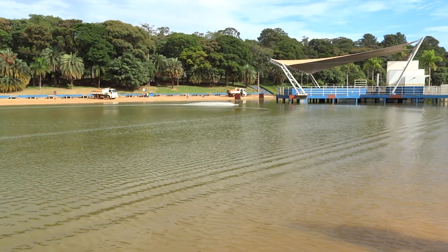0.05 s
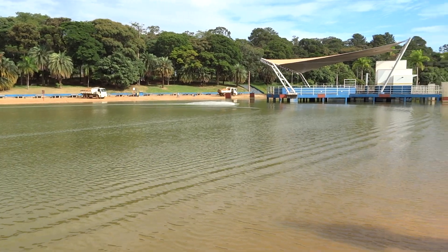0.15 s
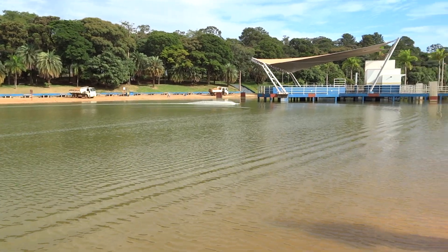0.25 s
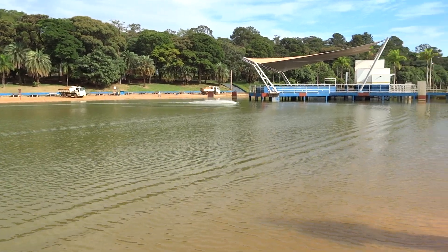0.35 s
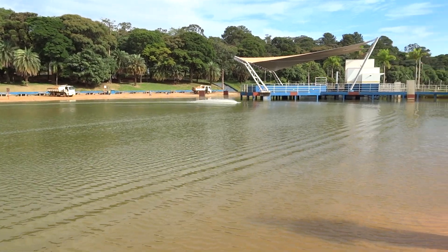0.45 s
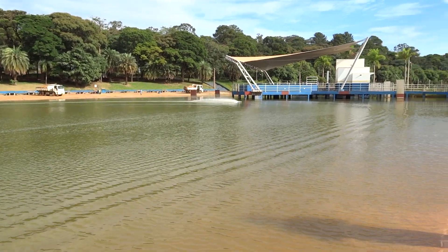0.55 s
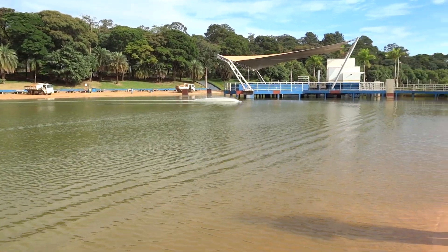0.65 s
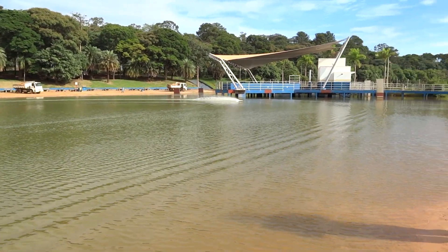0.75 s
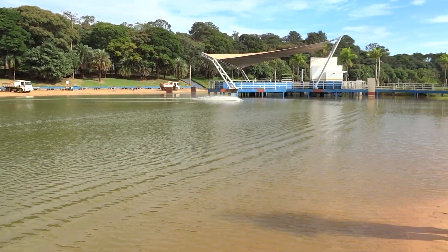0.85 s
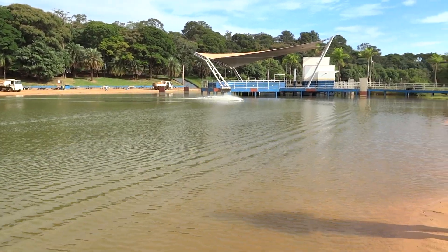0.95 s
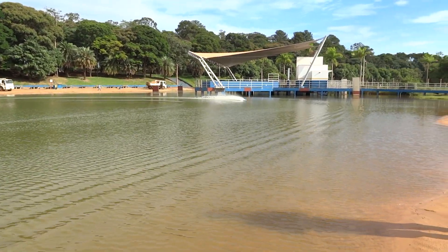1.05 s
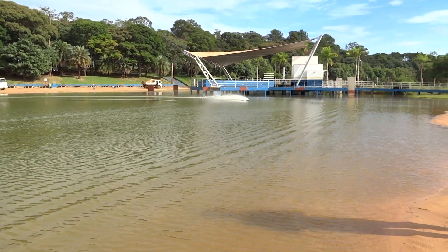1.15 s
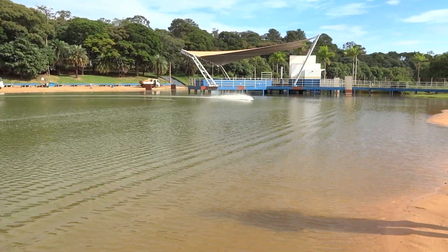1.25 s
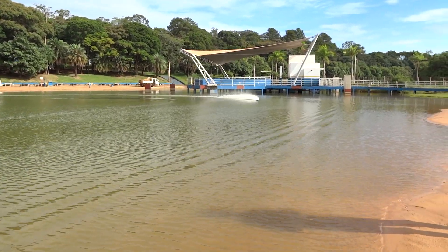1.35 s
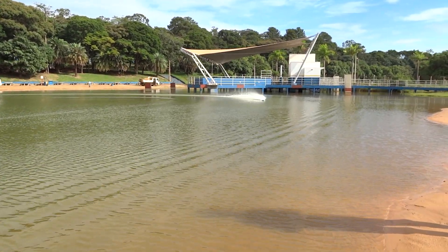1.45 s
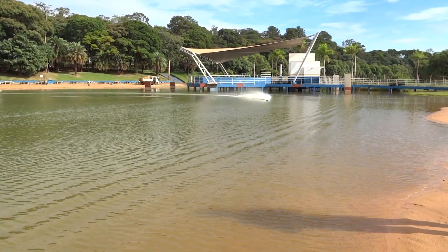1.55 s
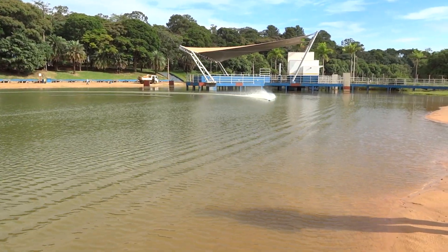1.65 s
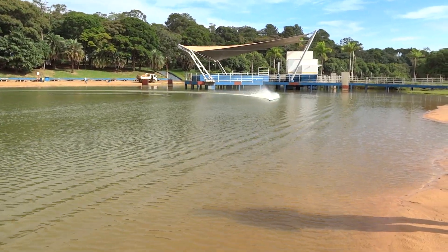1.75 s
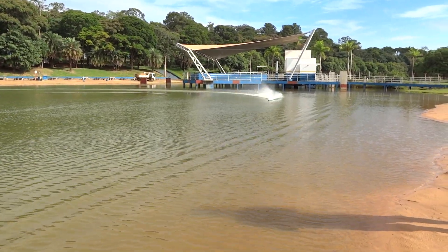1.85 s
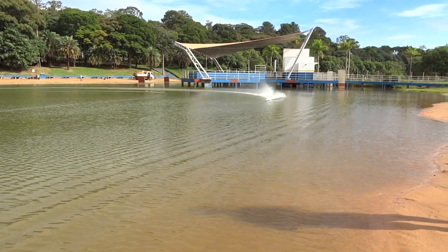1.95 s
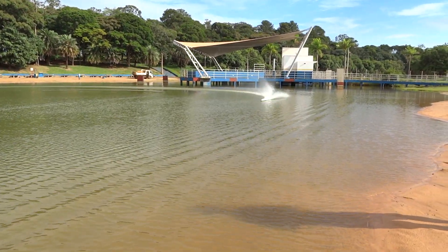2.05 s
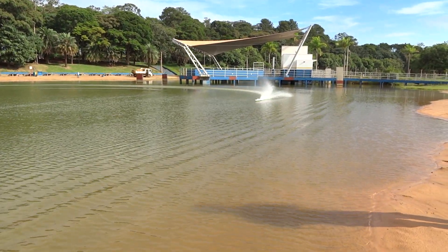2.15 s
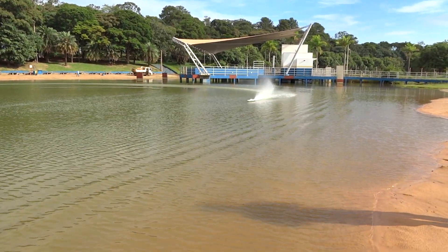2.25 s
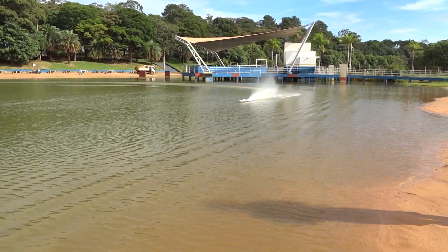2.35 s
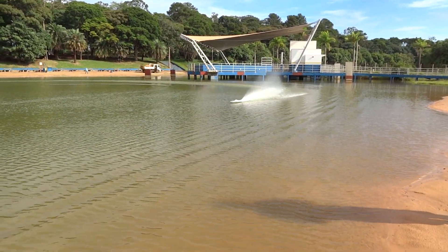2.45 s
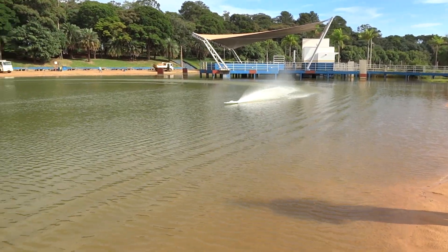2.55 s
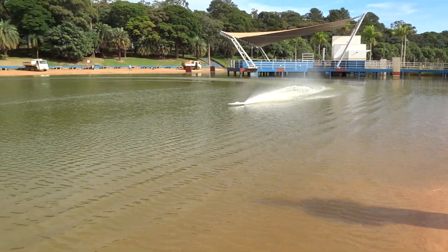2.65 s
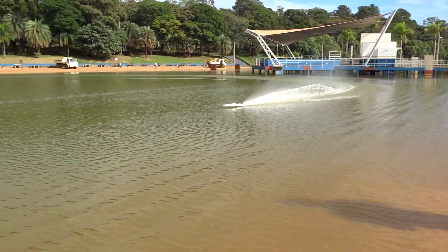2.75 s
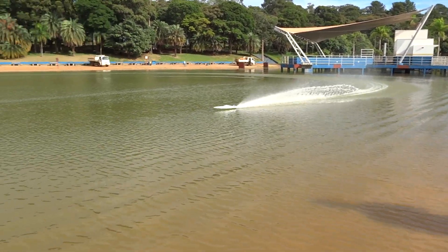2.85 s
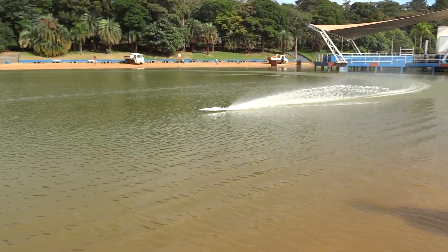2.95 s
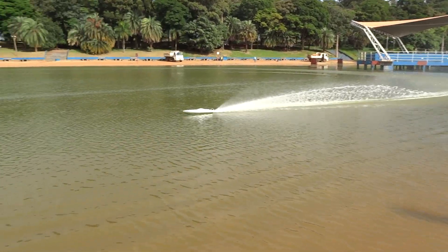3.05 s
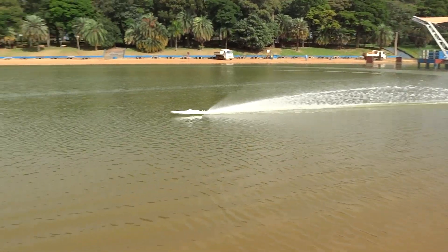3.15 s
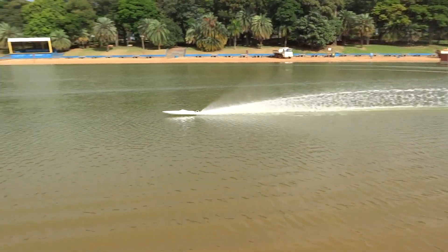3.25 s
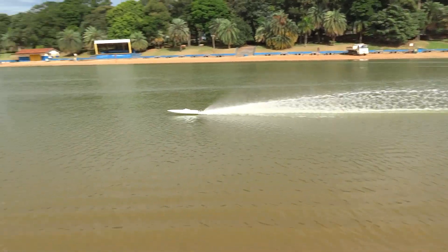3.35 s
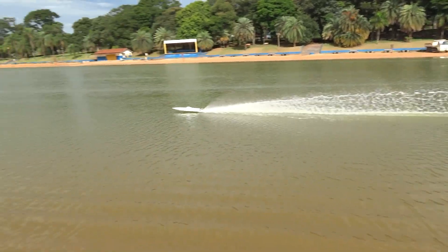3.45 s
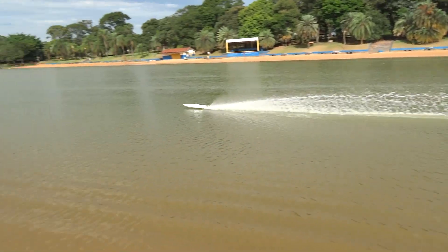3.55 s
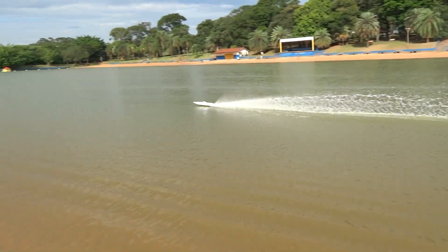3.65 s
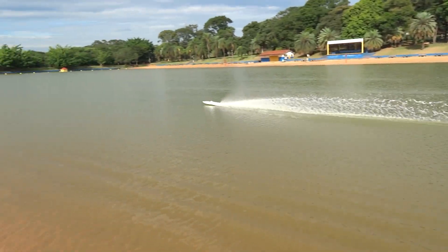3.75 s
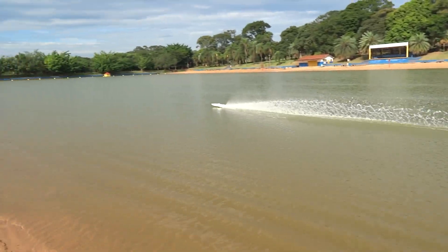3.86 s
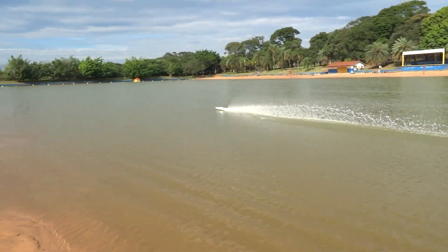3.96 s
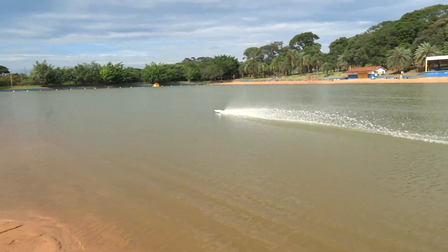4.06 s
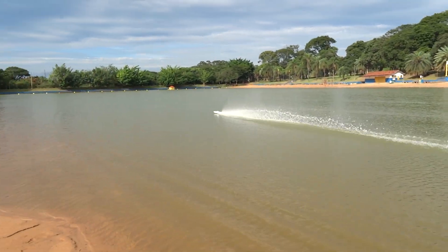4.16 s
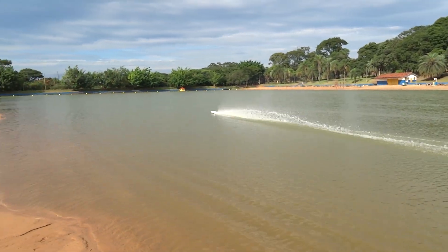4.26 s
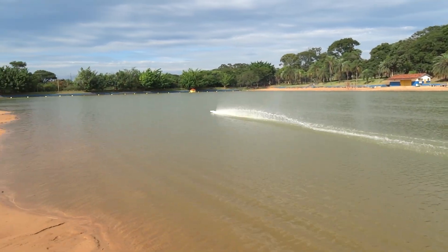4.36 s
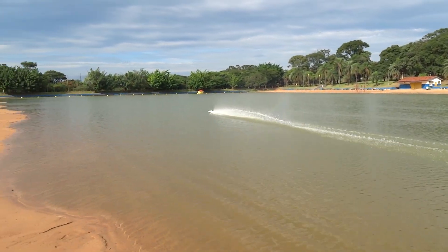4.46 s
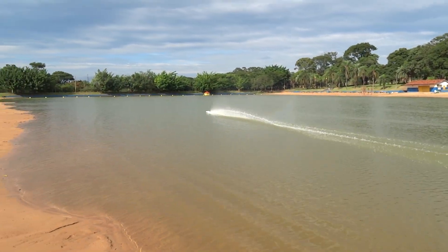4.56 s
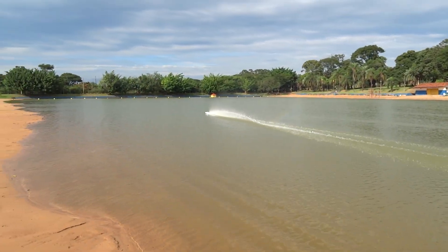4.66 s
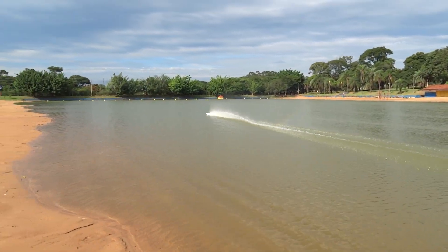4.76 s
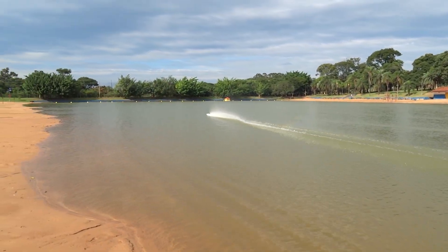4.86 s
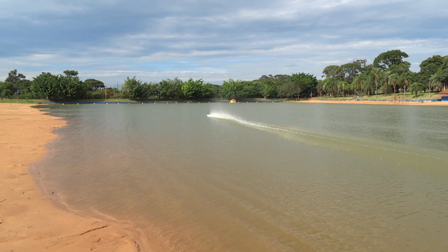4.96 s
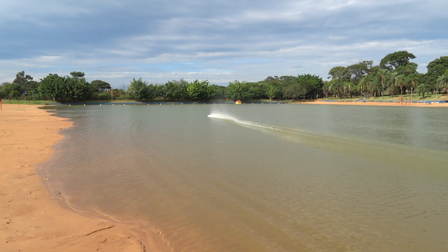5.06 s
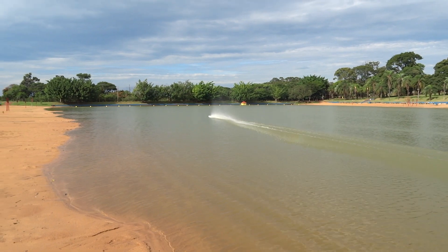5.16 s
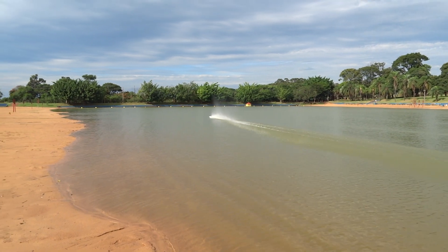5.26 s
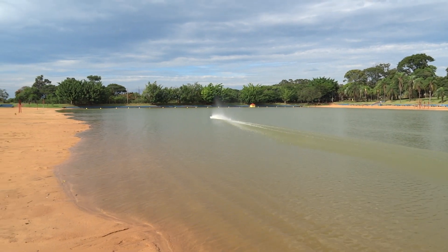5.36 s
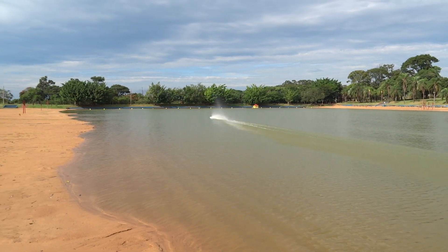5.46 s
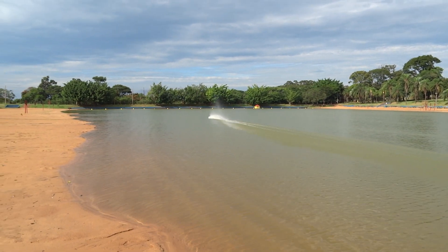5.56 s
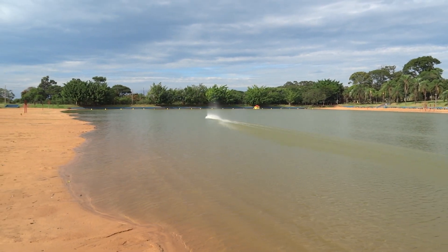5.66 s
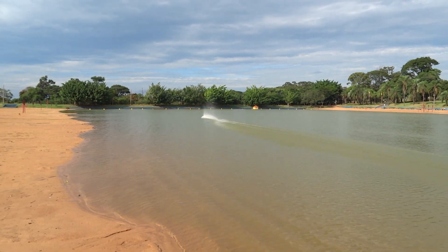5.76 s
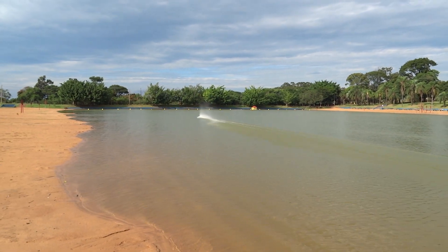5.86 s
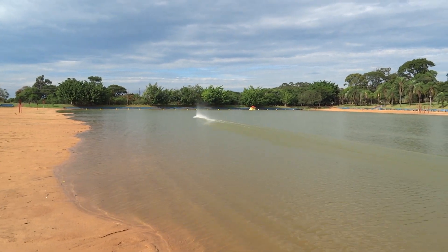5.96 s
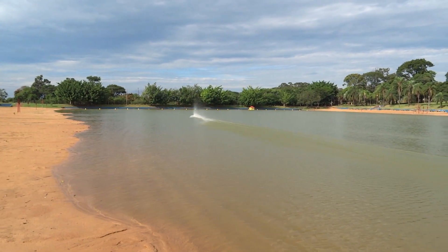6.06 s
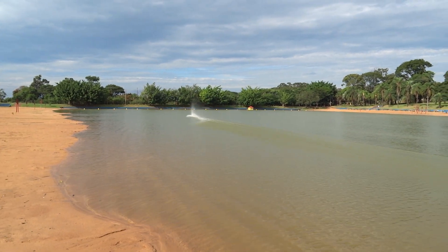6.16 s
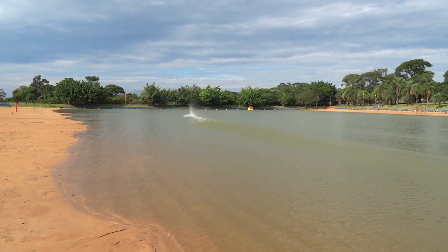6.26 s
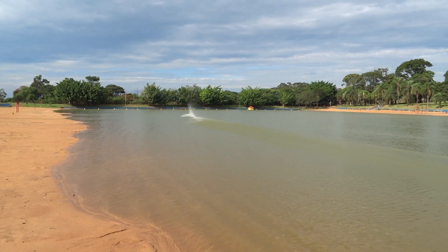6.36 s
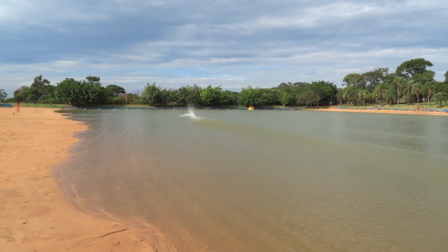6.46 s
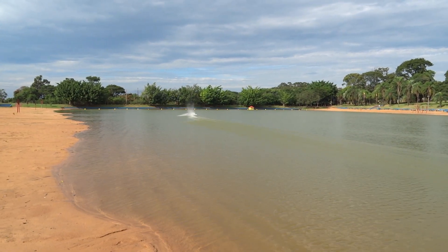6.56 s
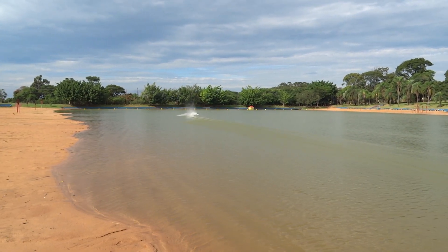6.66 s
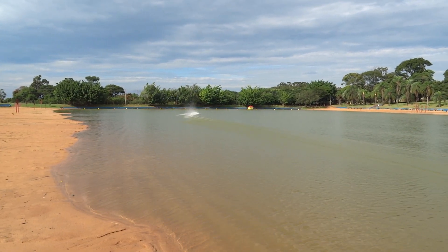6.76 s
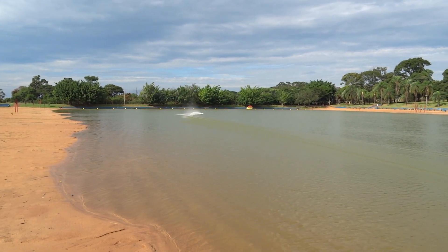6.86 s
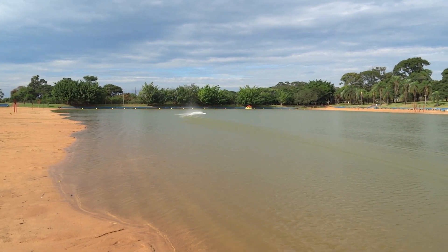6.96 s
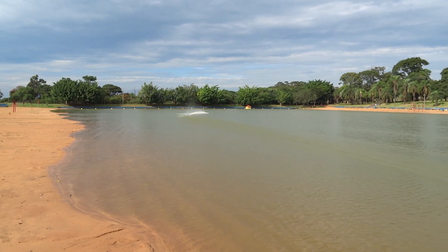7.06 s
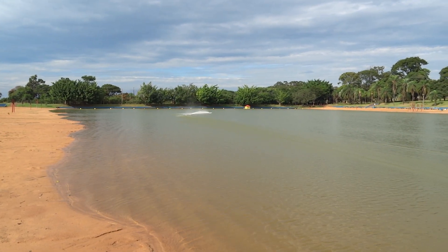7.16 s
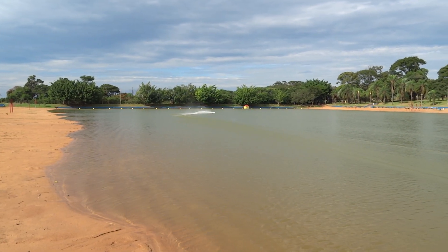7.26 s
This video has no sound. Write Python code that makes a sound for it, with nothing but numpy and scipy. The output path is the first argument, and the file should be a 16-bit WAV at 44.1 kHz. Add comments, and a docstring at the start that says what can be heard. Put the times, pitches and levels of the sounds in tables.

```python
"""Out on a lake, a radio-controlled speedboat races in, passes the shore and runs off into a far turn.
Its whine is a stack of sine tones on the orders of the shaft, led by the two-bladed propeller.
Filtered noise makes the churn, splash and hissing rooster tail; random grains and short cracks make it spatter.
Behind it lie a low wash, a faint drone and a breeze in the trees. Low noise makes a handling thump
and then, as the boat fades, gusts of wind; gliding whistles make far birds at the end."""
import sys
import numpy as np
from scipy import signal
from scipy.fft import rfft, irfft, next_fast_len
from scipy.io import wavfile

SR = 44100
rng = np.random.default_rng(int(sys.argv[2]) if len(sys.argv) > 2 else 0)


def put_to_file(sound):
    """Save the sound as 16-bit audio at rate SR, in the file named by the first command-line argument."""
    columns = np.atleast_2d(sound).T  # one column per channel
    safe = np.clip(columns, -1, 1)
    whole_steps = np.round(safe * 32767)
    wavfile.write(sys.argv[1], SR, whole_steps.astype(np.int16))


N = 322371
TIME = np.arange(N) / SR  # seconds


# Motor speed before Doppler. Each row: time in seconds, shaft speed in turns per second.
SHAFT_SPEED = [(0.0, 388.4), (0.4, 387.9), (0.88, 389.7), (2.0, 389.1), (2.08, 392.3), (2.64, 395.3),
               (2.88, 392.5), (3.04, 393.2), (3.36, 392.7), (3.76, 393.8), (4.4, 394.2), (4.96, 393.4),
               (5.12, 394.5), (5.76, 394.5), (6.0, 396.3), (6.32, 403.1), (6.72, 399.0), (7.3, 398.2)]


def shaft_angle(wobble_turns_per_s=0.5065, shake_turns_per_s=0.7):
    """Motor speed with its Doppler shift, wavering a little as the propeller bites the ripples; in radians."""
    speed, = in_time(SHAFT_SPEED)
    receding_m_per_s = BOAT_M_PER_S * ahead_m(0) / np.hypot(CLOSEST_M, ahead_m(0))
    heard = speed * (1 - receding_m_per_s / SOUND_M_PER_S)
    waver = wobble_turns_per_s * drift(9.26) + shake_turns_per_s * drift(69.2)
    return 2 * np.pi * np.cumsum(heard + waver) / SR


# The blade tone, at twice the shaft speed. Each row: time in seconds, level in dB.
BLADE_TONE = [(0.0, -38.8), (0.4, -34.0), (1.44, -40.6), (2.64, -26.8), (2.83, -16.0), (3.02, -14.6),
              (3.14, -17.5), (3.23, -23), (3.33, -19.3), (3.46, -19.8), (3.6, -30), (3.75, -26.5),
              (4.0, -29.0), (4.16, -35.8), (4.32, -30.7), (5.5, -41.3), (6.16, -45.3), (6.21, -57),
              (6.31, -49), (6.42, -59), (6.7, -53), (7.04, -58), (7.2, -51), (7.3, -50.0)]
# The octave above the blade tone. Each row: time in seconds, level in dB.
BLADE_OCTAVE = [(0.0, -42.5), (0.8, -32.5), (2.08, -45.5), (2.32, -31), (2.55, -28.5), (3.12, -30),
                (3.36, -47), (3.44, -31), (3.6, -47), (3.76, -28), (4.08, -32), (4.32, -34.5), (4.4, -30),
                (4.88, -43.5), (5.2, -39), (5.68, -67), (6.15, -50.5), (6.45, -48), (6.66, -48.5),
                (6.78, -61), (7.3, -64)]


def propeller(angle, remote, flutter_db=1.23):
    """Two blades slap the surface on every turn; far off, their tone comes by many paths and breaks up."""
    paths = many_paths(scattered=0.65 * remote ** 3, rate_hz=16)
    tone_db, = in_time(BLADE_TONE)
    octave_db, = in_time(BLADE_OCTAVE)
    tone = np.abs(paths) * partial(2 * angle + np.angle(paths), tone_db, flutter_db)
    octave = partial(4 * angle, octave_db, flutter_db)
    return tone + octave


# The other orders of the shaft, as if at the closest point.
# Each row: order number, level in dB coming, level in dB going.
SHAFT_ORDERS = [(1, -58, -52.5), (3, -38.5, -42), (5, -36, -34.5), (6, -37.5, -32), (7, -51, -39.5),
                (8, -40.5, -35), (9, -38, -51), (10, -38.5, -43), (11, -38.5, -36), (12, -37, -44),
                (13, -43, -50), (14, -40, -52), (15, -38, -41), (16, -33.5, -41), (17, -51, -36),
                (18, -37, -39), (19, -48, -42), (20, -40, -42), (22, -48, -41)]
# The hull radiates each order in beams that sweep over the shore.
# Each row: order number, centre in seconds, peak in dB as if at the closest point, bell spread in seconds.
HULL_BEAMS = [(1, 0.33, -42.5, 0.89), (1, 1.78, -37, 0.54), (1, 2.84, -47.5, 0.17), (1, 3.71, -46, 0.18),
              (1, 4.5, -45, 0.75), (3, 3.21, -29, 0.09), (5, 0.26, -27.5, 0.27), (5, 2.32, -28.5, 0.28),
              (5, 2.95, -26, 0.08), (5, 3.32, -29.5, 0.063), (5, 3.78, -23.5, 0.14), (5, 4.7, -28, .08),
              (5, 5.95, -35, 0.11), (5, 6.45, -30, 0.13), (6, 1.67, -31.5, .2), (6, 2.32, -25.5, 0.24),
              (6, 3.35, -32, 0.1), (6, 3.85, -28.5, 0.093), (6, 4.58, -27.5, 0.13), (6, 5.2, -25, .17),
              (6, 5.77, -26.5, 0.32), (6, 6.42, -29, 0.15), (7, 3.7, -32, 0.18), (7, 4.35, -29, 0.28),
              (7, 5.2, -28, 0.14), (7, 5.67, -26.5, 0.33), (8, 3.21, -29.5, .16), (8, 4.07, -28.5, 0.15),
              (9, 2.42, -30, 0.14), (9, 3.9, -35, 0.2), (9, 5.9, -29, 0.12), (10, 0.32, -31, .08),
              (10, 1.03, -33, .15), (10, 3.43, -34, 0.13), (10, 4.25, -28.5, 0.17), (10, 5.42, -30, 0.17),
              (10, 5.9, -25, 0.16), (10, 6.4, -31.5, 0.2), (11, 3.07, -31.5, 0.22), (11, 3.67, -34, .15),
              (11, 5.88, -28, .12), (12, 2.74, -27, .16), (12, 3.36, -31, .12), (12, 4.3, -33, .18),
              (13, 4.2, -35, .3), (14, .72, -33, .1), (14, 2.5, -38, .25), (14, 4.35, -37, .25),
              (16, 2.42, -23, 0.074), (16, 2.82, -33, .14), (17, 4.2, -34, .25), (20, .7, -34, 0.7)]
# The hull digs in and throws a surge of water.
# Each row: centre in seconds, bell spread in seconds, extra spray in dB, extra splash in dB.
SURGES = [(0.313, 0.079, 7.5, 5.5), (0.734, 0.12, 6.5, 4), (1.006, 0.097, 3.5, 2), (1.217, 0.027, 3, 1.5),
          (1.42, 0.088, 5, 5), (1.67, 0.1, 7, 4), (2.426, 0.073, 0.5, 1.5), (3.088, 0.22, 2.5, 2.5),
          (4.266, 0.25, 2, 3.5), (4.786, 0.34, 2, 1), (5.7, .08, 2, 1), (5.91, 0.048, -2.5, 4.5)]
# The throttle eases in the far turn: start and length in seconds, drop of these orders in dB.
EASE_S, EASE_TAKES_S, EASE_DB = 6.61, 0.12, 11
# Share of power frayed into noise, per order: near, and added far off; corner of the fraying in Hz.
FRAY_NEAR, FRAY_FAR, FRAY_HZ = 0.006, 0.012, 100
AIR_LOSS_DB = 0.1  # per order squared, at full remoteness


def motor(angle, remote, fading_db=0.9, bite_db=0.17):
    """Shaft orders fade with distance and flare in beams; high ones buzz in surges, fray and lose most to air."""
    reach_db = passing_db(0, 0) - EASE_DB * np.clip((TIME - EASE_S) / EASE_TAKES_S, 0, 1)
    # only surges with strong spray load the motor; it starts lightly loaded
    load = sum(swell(s, 0, spread_s) for s, spread_s, spray_db, _ in SURGES if spray_db > 2.8)
    load = load - np.clip(1 - TIME / BUILD_S, 0, 1) / 2
    stern = going()
    out = np.zeros(N)
    for order, coming_db, going_db in SHAFT_ORDERS:
        facing_db = coming_db + stern * (going_db - coming_db)
        all_round = from_db(facing_db + fading_db * drift(3.6) + bite_db * order * load)
        beam_power = sum(swell(s, db, spread_s) ** 2 for k, s, db, spread_s in HULL_BEAMS if k == order)
        paths = many_paths(order * (FRAY_NEAR + FRAY_FAR * remote), FRAY_HZ)
        line_db = reach_db - AIR_LOSS_DB * order ** 2 * remote
        line = partial(order * angle + np.angle(paths), line_db, flutter_db=1.5)
        out += np.sqrt(all_round ** 2 + beam_power) * np.abs(paths) * line
    return out


# The hollow hull's resonances. Each row: pitch in Hz, width in Hz, relative dB coming, relative dB going.
HULL_RESONANCES = [(596, 126, -8, -9.5), (780, 109, -1, 0), (1178, 128, 2.5, -1), (1770, 370, -0.5, -1.5)]


def churn(angle, churn_db, beat=0.39):
    """Water beaten by the blades drums in the hollow hull: pulsing noise through four resonances."""
    drive = noise() * (1 + beat * np.cos(2 * angle)) * from_db(1.4 * drift(40))
    body = np.zeros(N)
    for k, (hz, width_hz, coming_db, going_db) in enumerate(HULL_RESONANCES):
        gain = from_db(coming_db + going() * (going_db - coming_db))
        body += (-1) ** k * gain * resonate(drive, hz, width_hz)  # alternate polarity
    return from_db(churn_db) * rms_one(band(body, low_hz=433, high_hz=2460))


# Tone of the rooster tail's hiss. Each row: frequency in Hz, relative level in dB.
SPRAY_TONE = [(2500, -42), (4500, -3), (5500, -3.5), (6700, 1), (7500, -0.5), (8500, 0), (9500, -4.5),
              (10500, -11.5), (11500, -20.5), (12500, -36.5), (15500, -52)]
# Tone of its finest droplets. Each row: frequency in Hz, relative level in dB.
MIST_TONE = [(8000, -12), (11000, 4), (12500, -1.5), (14000, -5.5), (15800, -15)]
# How grainy the spray is. Each row: time in seconds, spatter as a share of power from 0 to 1.
SPATTER_SHARE = [(0, 0.13), (1.3, 0.38), (1.65, 0.55), (1.9, 0.5), (2.3, 0.15), (3.3, 0.099), (4.5, 0.19),
                 (7.3, 0.51)]


def spray(spray_db, remote, near_db=-21, mist_growth=1.07, mist_db=-35, far_loss_db=19):
    """The rooster tail spatters and hisses; its finest droplets tick brightly and carry least far."""
    grainy = np.clip(in_time(SPATTER_SHARE)[0], 0, 1)
    grains = spatter(per_s=1000, spread_db=3.45, burst_s=0.00035)
    drops = np.sqrt(grainy) * grains + np.sqrt(1 - grainy) * noise()
    drops = drops * from_db(0.92 * drift(18.0))
    hiss = from_db(spray_db) * rms_one(band(colour(drops, SPRAY_TONE), low_hz=1800, high_hz=18300))
    droplets = drops + from_db(-2) * spatter(per_s=350, spread_db=2.2, burst_s=0.0003)
    mist = rms_one(band(colour(droplets, MIST_TONE), low_hz=6900, high_hz=18100))
    coming_db = np.interp(TIME, [0, 2.0], [-7, 0])
    # the mist rises and falls slightly more than the hiss
    mist_level_db = mist_db + coming_db + mist_growth * (spray_db - near_db) - far_loss_db * remote
    return hiss + from_db(mist_level_db) * mist


# Tone of the falling water. Each row: frequency in Hz, relative level in dB.
SPLASH_TONE = [(500, -10), (1000, -6.5), (1500, -0.5), (1950, 4.5), (2200, 1.5), (2500, 4.5), (2900, 0.5),
               (4000, 2), (4700, -5), (5600, -8), (8000, -17.5), (14000, -46)]


def splash(splash_db, drops_db=-4):
    """The sheet of water falls back on the lake: smooth noise mixed with spatter."""
    water = rms_one(noise() + from_db(drops_db) * spatter(per_s=1200, spread_db=4.0, burst_s=0.0042))
    sheet = rms_one(band(colour(water, SPLASH_TONE), low_hz=452, high_hz=16000))
    return from_db(splash_db + 0.13 * drift(24)) * sheet


# Sharp slaps of spray. Each row: start in seconds, peak level in dB, resonance in Hz, its width in Hz.
SLAPS = [(0.2124, -22, 8100, 3000), (0.614, -19, 6500, 3500), (0.621, -21, 7500, 3500),
         (1.1772, -20, 8100, 3000), (1.3039, -20, 7400, 3000), (1.3838, -18, 8200, 3000),
         (1.4445, -15, 6000, 6000), (1.4735, -15, 8000, 1500), (1.4843, -13.5, 8000, 4000),
         (1.514, -15, 6500, 2500), (1.586, -11.5, 8000, 2000), (1.6097, -13.5, 7300, 3500),
         (1.6334, -17, 8000, 3500), (1.6541, -16, 8000, 3500), (1.6921, -14, 8100, 3000),
         (1.6974, -14, 8000, 3500), (1.7764, -18, 7200, 3000), (1.7963, -16, 6650, 3000),
         (1.8287, -16, 8000, 2500), (1.9829, -13.5, 8300, 1800), (1.9949, -13, 9000, 7000),
         (2.0517, -15.5, 7000, 2000), (2.2668, -16, 8200, 2500), (2.9956, -14, 6500, 3000),
         (4.9487, -15, 7600, 2500)]


def slaps(decay_s=0.00065):
    """Large drops crack on the water: dying bursts of noise, each through a resonance of its own."""
    out = np.zeros(N)
    age = TIME[:SR // 50]
    for s, db, hz, width_hz in SLAPS:
        burst = rng.standard_normal(len(age)) * np.exp(-age / decay_s)
        crack = band(resonate(burst, hz, width_hz), low_hz=hz / 1.5, high_hz=hz * 1.15)
        at = round(s * SR)
        out[at:at + len(age)] += from_db(db) * crack / np.abs(crack).max()
    return out


# Level and lag behind the boat; size of the patch, which softens its peak; loss at full remoteness.
CHURN_DB, CHURN_LAG_S, CHURN_SIZE_M, CHURN_FAR_DB = -24.5, 0.0078, 0.5, 6
SPLASH_DB, SPLASH_LAG_S, SPLASH_SIZE_M, SPLASH_FAR_DB = -20.9, 0.16, 0.57, 9.5
SPRAY_DB, SPRAY_LAG_S, SPRAY_SIZE_M, SPRAY_FAR_DB = -18.9, 0.13, 4.2, 22.5
# The rooster tail builds up as the boat gathers way: dB lacking at first, seconds to build.
BUILD_DB, BUILD_S = 3, 0.9


def water_levels(remote, splash_bow_db=1.5, spray_bow_db=0.5):
    """Churn, splash and spray in dB follow the pass and sink far off; splash and spray swell in the surges."""
    lacking_db = BUILD_DB * np.clip(1 - (TIME / BUILD_S) ** 2, 0, 1)
    bow = 1 - going()
    spray_surge_db = sum(db * swell(s, 0, spread_s) for s, spread_s, db, _ in SURGES)
    splash_surge_db = sum(db * swell(s, 0, spread_s) for s, spread_s, _, db in SURGES)
    more_spray_db = spray_surge_db - lacking_db - spray_bow_db * bow
    more_splash_db = splash_surge_db - lacking_db - splash_bow_db * bow
    churn_db = CHURN_DB + passing_db(CHURN_LAG_S, CHURN_SIZE_M) - CHURN_FAR_DB * remote
    splash_db = SPLASH_DB + passing_db(SPLASH_LAG_S, SPLASH_SIZE_M) - SPLASH_FAR_DB * remote
    spray_db = SPRAY_DB + passing_db(SPRAY_LAG_S, SPRAY_SIZE_M) - SPRAY_FAR_DB * remote
    return churn_db, splash_db + more_splash_db, spray_db + more_spray_db


# The low wash, before its far loss. Each row: time in seconds, level in dB.
WASH_LEVEL = [(0, -46), (.9, -50.5), (1.6, -46.5), (2.6, -46), (3.2, -53), (3.8, -64), (4.6, -62),
              (5.3, -63), (5.6, -67)]
# Tone of the wash. Each row: frequency in Hz, relative level in dB.
WASH_TONE = [(25, -28), (60, -17), (150, -10.5), (215, -7.5), (280, -1.5), (450, -3.5), (700, 5),
             (1500, -47), (6000, -60)]


def wash(remote):
    """Low wash: dark noise, sinking as the boat gets loud and staying low."""
    wash_db, = in_time(WASH_LEVEL)
    return from_db(wash_db - 1.9 * remote + 1.0 * drift(8.9)) * rms_one(colour(noise(), WASH_TONE))


# The faint drone. Each row: time in seconds, level in dB.
DRONE_LEVEL = [(0, -65), (.9, -67.5), (1.3, -58.5), (2.6, -59.5), (3.2, -72.5), (5.8, -69.5), (7.31, -76)]


def drone(hz=210, width_hz=22):
    """A faint, unsteady low drone lies under the boat: noise through the same narrow resonance twice."""
    db, = in_time(DRONE_LEVEL)
    hum = resonate(resonate(noise(), hz, width_hz), hz, width_hz)
    return from_db(db) * rms_one(hum)


# Tone of the far shore. Each row: frequency in Hz, relative level in dB.
SHORE_TONE = [(25, -22), (90, -2.5), (220, -14), (550, -1), (1000, -2), (3000, -8.5), (10000, -24.5),
              (14000, -59)]


def shore(still_db=-64, breeze_db=14.0, from_s=4.97, rise_s=0.8):
    """A breeze gets up in the trees as the boat leaves: shaped noise that rises and stays."""
    rise = np.clip((TIME - from_s) / rise_s, 0, 1)
    return from_db(still_db + breeze_db * rise) * rms_one(colour(noise(), SHORE_TONE))


# One short handling thump, then gusts of wind.
# Each row: centre in seconds, peak level in dB, bell spread in seconds.
MICROPHONE_PUFFS = [(2.98, -64, 0.016), (5.696, -50, 0.017), (5.83, -61, 0.027), (5.93, -62, .035),
                    (6.25, -59, .05), (6.35, -52, 0.04), (6.47, -58, .04), (6.785, -53, 0.045),
                    (6.89, -60, .025), (7.01, -56.5, 0.05), (7.3, -53, 0.023)]
# Tone of the puffs. Each row: frequency in Hz, relative level in dB.
PUFF_TONE = [(20, -18), (60, -17), (130, 0), (220, -2), (350, -7.5), (700, -32), (2000, -55)]


def microphone_puffs():
    """Low puffs on the microphone: one short handling thump, then gusts of wind, all swells of low noise."""
    puffs = sum(swell(*puff) for puff in MICROPHONE_PUFFS)
    return puffs * from_db(2 * drift(25)) * rms_one(colour(noise(), PUFF_TONE))


# Notes of far birds. Each row: start in seconds, length in seconds, first pitch in Hz, last pitch in Hz, level in dB.
BIRD_NOTES = [(6.475, .036, 6380, 6080, -52.5), (6.7, .068, 6480, 6950, -59),
              (6.766, .037, 6850, 5700, -54.5), (6.82, .075, 5150, 5060, -56),
              (6.955, .075, 3000, 3005, -53.5), (7.07, .14, 2990, 2990, -61), (7.16, .04, 6550, 6250, -60)]


def bird(waver_hz=55, trees_db=-5, trees_t60_s=0.5):
    """Thin slurred whistles swell, glide and die, and the trees smear them into a faint tail."""
    out = np.zeros(N)
    for s, length_s, first_hz, last_hz, db in BIRD_NOTES:
        along = np.clip((TIME - s) / length_s, 0, 1)
        hz = first_hz + along * (last_hz - first_hz) + waver_hz * drift(121)
        envelope = np.sqrt(np.abs(np.sin(np.pi * along)))
        out += envelope * partial(2 * np.pi * np.cumsum(hz) / SR, db, flutter_db=2.5)
    tail = (noise() * from_db(-60 * TIME / trees_t60_s))[:SR]
    smeared = signal.fftconvolve(out, tail / np.linalg.norm(tail))[:N]
    return out + from_db(trees_db) * smeared


# The pass: time abeam, speed, closest distance; the way ahead is held at TURN_M until the boat has turned in.
ABEAM_S, BOAT_M_PER_S, CLOSEST_M, TURN_M = 3.43, 14.9, 6.7, 29
SOUND_M_PER_S = 343


def ahead_m(lag_s):
    """How far the boat was past the listener a moment ago; negative while it comes."""
    return np.maximum(BOAT_M_PER_S * (TIME - ABEAM_S - lag_s), -TURN_M)


def passing_db(lag_s, size_m):
    """Level falls with distance; a broad patch of water peaks less sharply."""
    return 20 * np.log10(CLOSEST_M / np.sqrt(CLOSEST_M ** 2 + size_m ** 2 + ahead_m(lag_s) ** 2))


def going(turn_s=0.81):
    """0 while the boat shows its bow, 1 once it shows its stern."""
    return np.clip(0.5 + (TIME - ABEAM_S) / turn_s, 0, 1)


# The boat enters the far turn. Each row: time in seconds, remoteness from 0 (near) to 1 (far off).
REMOTENESS = [(5.68, 0.16), (5.92, 0.49), (6.75, 0.92), (7.31, 1)]


def remoteness():
    """How far off the boat is, as a curve over time."""
    return in_time(REMOTENESS)[0]


def many_paths(scattered, rate_hz):
    """Gain and phase, as a complex signal, of a tone partly scattered off the ripples and the banks."""
    share = np.clip(scattered, 0, 1)
    return np.sqrt(1 - share) + np.sqrt(share / 2) * (drift(rate_hz) + 1j * drift(rate_hz))


def partial(angle, level_db, flutter_db):
    """A sine tone of the given RMS level, fluttering in level."""
    return np.sqrt(2) * from_db(level_db + flutter_db * drift(50)) * np.sin(angle + rng.uniform(0, 2 * np.pi))


def spatter(per_s, spread_db, burst_s):
    """Drops hit the lake at random, each a tiny burst of noise of its own size; unit power."""
    sizes = from_db(spread_db * np.minimum(rng.exponential(1, N), 5))
    hits = (rng.random(N) < per_s / SR) * sizes ** 2
    power = signal.lfilter([1], [1, -np.exp(-1 / (burst_s * SR))], hits + 1e-18)
    return rms_one(np.sqrt(power) * noise())


def swell(s, db, spread_s):
    """A bell-shaped rise and fall in gain."""
    away = np.minimum(np.abs(TIME - s) / spread_s, 10)
    return from_db(db) * np.exp(-0.5 * away ** 2)


def drift(corner_hz):
    """Smooth random wandering of unit RMS: low-passed noise made at a twentieth of the sample rate."""
    r = np.exp(-2 * np.pi * corner_hz * 20 / SR)
    raw = rng.standard_normal(N // 20 + 4002)
    slow = signal.lfilter([1], [1, -2 * r, r * r], raw)[4000:]  # skip the settling
    return np.interp(np.arange(N) / 20, np.arange(len(slow)), rms_one(slow))


def resonate(x, hz, width_hz):
    """One two-pole resonance with a gain of about 1 on top."""
    r = np.exp(-np.pi * width_hz / SR)
    feed = np.array([1, 0, -1]) * (1 - r * r) / 2
    return signal.lfilter(feed, [1, -2 * r * np.cos(2 * np.pi * hz / SR), r * r], x)


def colour(x, spectrum):
    """Filter by a spectrum drawn on a log-frequency axis."""
    size = next_fast_len(N + 4096)
    hz, db = np.transpose(spectrum)
    bins_hz = np.maximum(np.fft.rfftfreq(size, 1 / SR), 1)
    gain = from_db(np.interp(np.log(bins_hz), np.log(hz), db))
    return irfft(rfft(x, size) * gain, size)[:N]


def band(x, low_hz, high_hz):
    """Gentle band-pass."""
    edges_hz = [low_hz, min(high_hz, SR / 2 - 1)]
    return signal.sosfilt(signal.butter(2, edges_hz, "band", fs=SR, output="sos"), x)


def noise():
    """White noise of unit power."""
    return rng.standard_normal(N)


def in_time(rows):
    """Each column of a curve at every sample."""
    s, *columns = np.transpose(rows)
    return [np.interp(TIME, s, c) for c in columns]


def from_db(db):
    """Decibels to gain."""
    return np.exp(np.asarray(db) * (np.log(10) / 20))


def rms_one(x):
    """Scale to unit power."""
    return x / np.sqrt(np.mean(x ** 2) + 1e-20)


# Side filter for echo and wash: uneven peaks and gaps, chiefly near 5 and 10 kHz.
# Each row: frequency in Hz, side gain in dB.
ECHO_SIDE_FILTER = [(30, -20), (130, -11), (280, -44), (600, -21), (1200, -52), (3000, -31.5), (4000, -38),
                    (5200, -19.5), (6600, -47), (8200, -62), (10000, -10), (11200, -22), (12200, -42),
                    (15500, -55)]
# Side filter for sound from all sides. Each row: frequency in Hz, side gain in dB.
DIFFUSE_SIDE_FILTER = [(30, -14), (110, -12), (250, -0.5), (600, -11), (2000, -3.5), (10000, -5)]


def scene(banks_db=12, near_echo_db=0.5):
    """The microphone follows the boat, so it stays central; far off, more of it comes back from the banks."""
    angle = shaft_angle()
    remote = remoteness()
    churn_db, splash_db, spray_db = water_levels(remote)
    whine = propeller(angle, remote) + motor(angle, remote)
    boat = whine + churn(angle, churn_db) + splash(splash_db) + spray(spray_db, remote) + slaps()
    delayed = np.interp(TIME - 0.013, TIME, boat, left=0)
    echo = from_db(near_echo_db + banks_db * remote) * delayed
    mid = boat + wash(remote) + drone() + shore() + microphone_puffs() + bird()
    # fresh noise for wash, shore and puffs makes their side independent of the mid
    side = colour(echo + wash(remote), ECHO_SIDE_FILTER)
    side = side + colour(shore() + microphone_puffs(), DIFFUSE_SIDE_FILTER)
    # the trail of spray spreads wide just after the pass
    side = side + swell(3.92, db=-23, spread_s=0.2) * band(echo, low_hz=2100, high_hz=10000)
    return np.array([mid + side, mid - side])


def record(dry, rumble_hz=35, cutoff_hz=15800):
    """The microphone sheds the deepest rumble; the top is cut steeply."""
    thin = signal.sosfilt(signal.butter(2, rumble_hz, "high", fs=SR, output="sos"), dry)
    return signal.sosfilt(signal.ellip(12, 0.1, 90, cutoff_hz, fs=SR, output="sos"), thin)


dry = scene()
out = record(dry)
put_to_file(out)
```